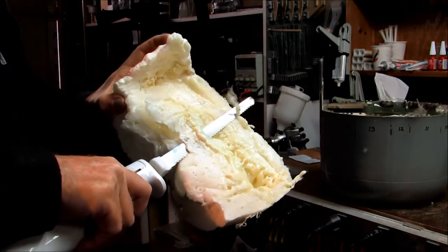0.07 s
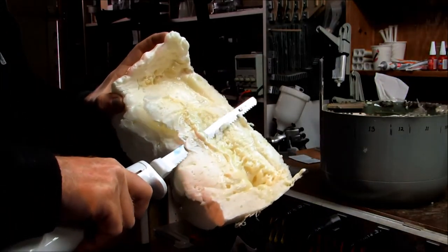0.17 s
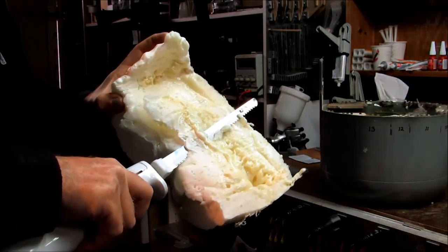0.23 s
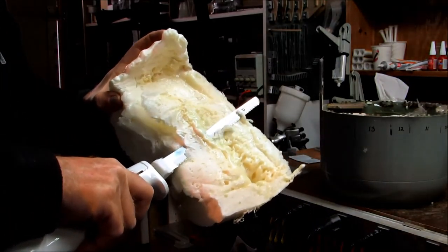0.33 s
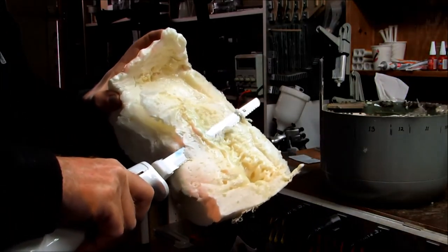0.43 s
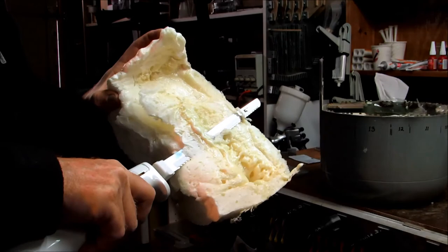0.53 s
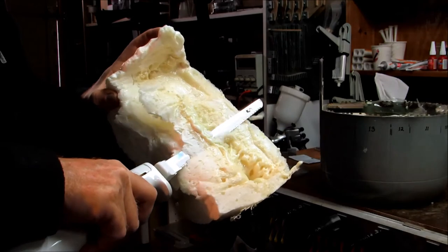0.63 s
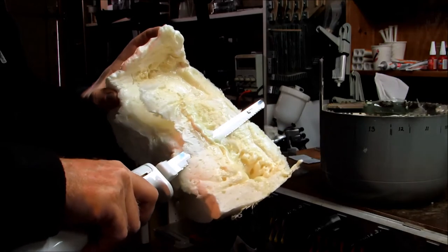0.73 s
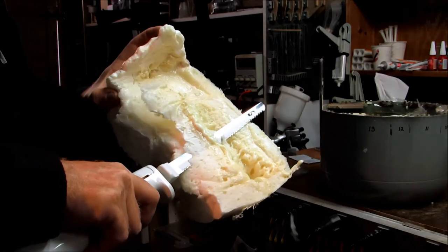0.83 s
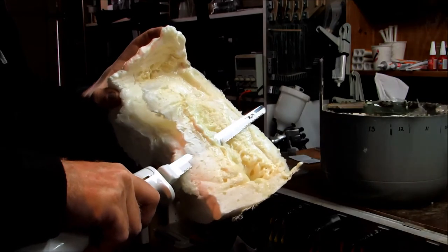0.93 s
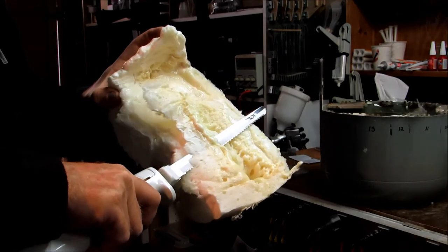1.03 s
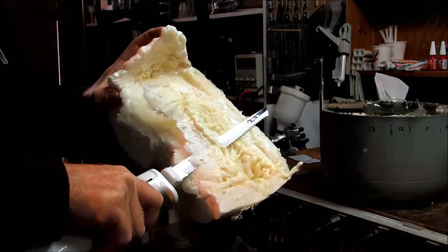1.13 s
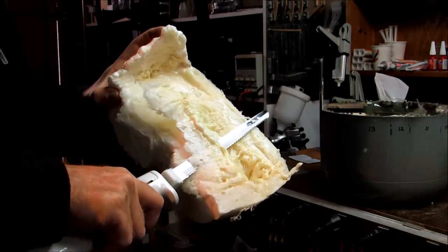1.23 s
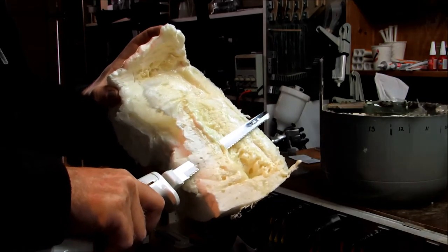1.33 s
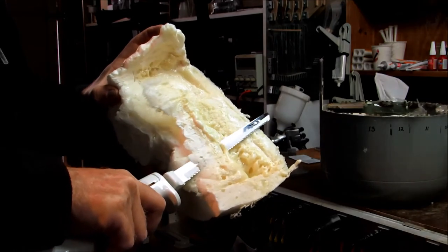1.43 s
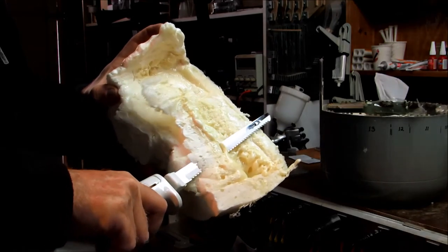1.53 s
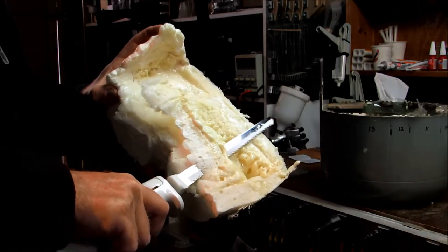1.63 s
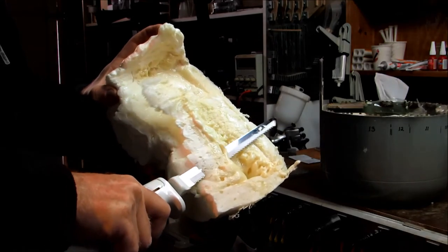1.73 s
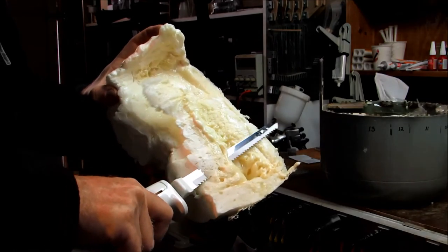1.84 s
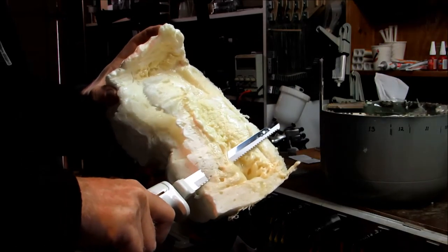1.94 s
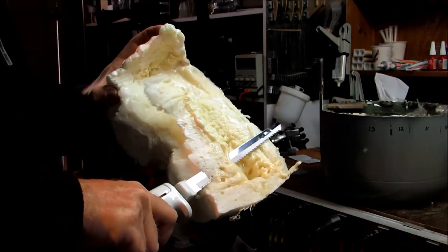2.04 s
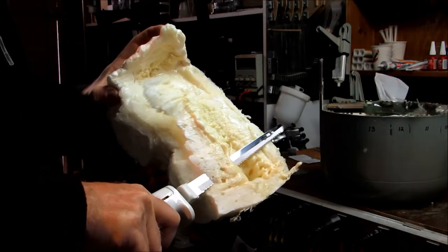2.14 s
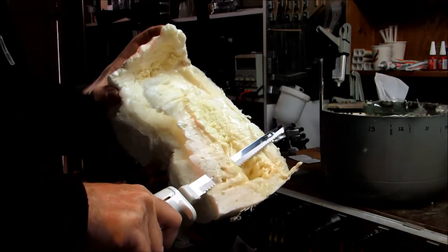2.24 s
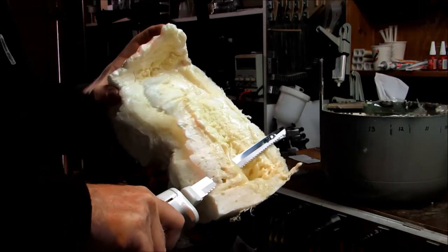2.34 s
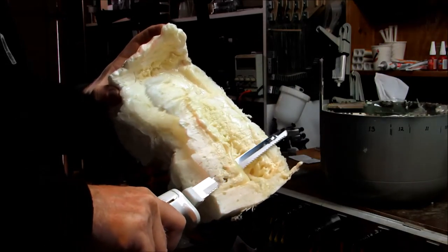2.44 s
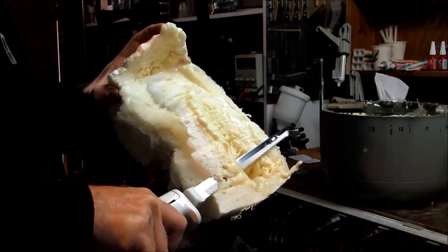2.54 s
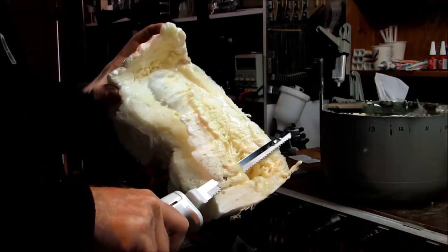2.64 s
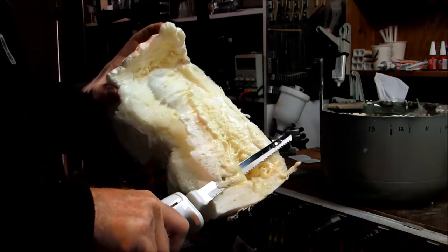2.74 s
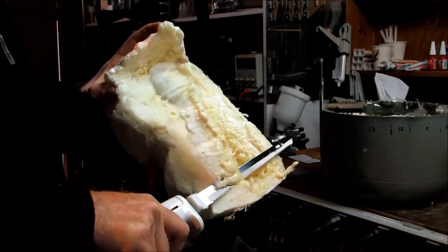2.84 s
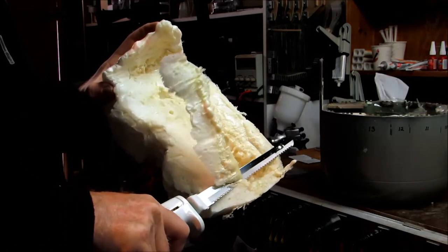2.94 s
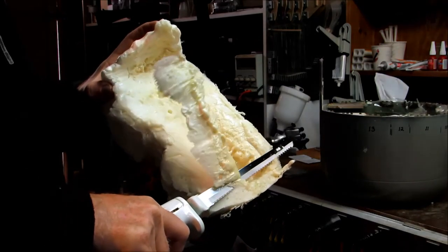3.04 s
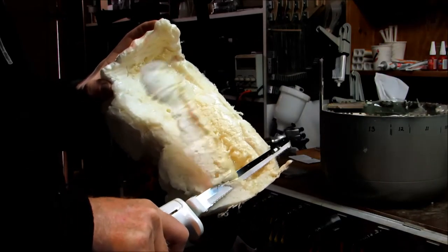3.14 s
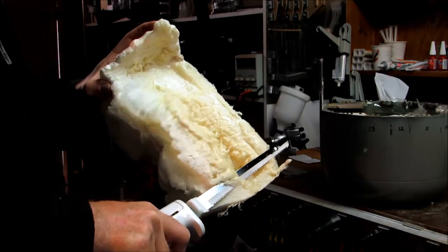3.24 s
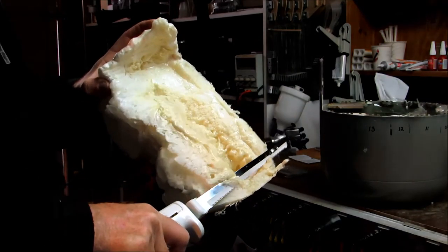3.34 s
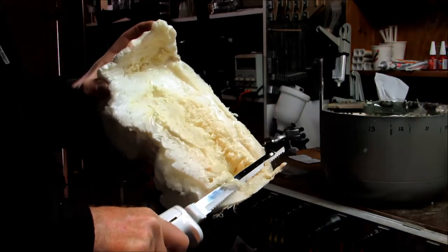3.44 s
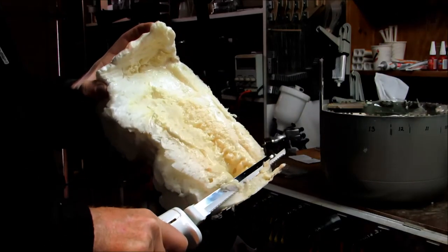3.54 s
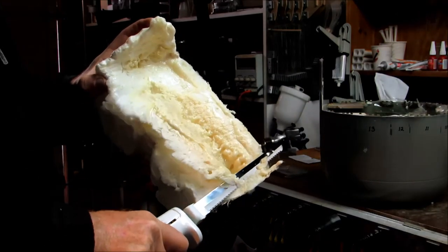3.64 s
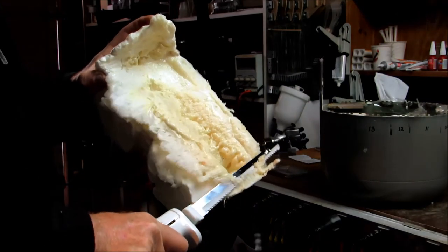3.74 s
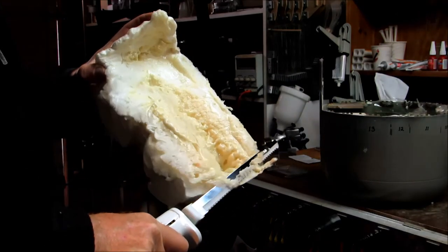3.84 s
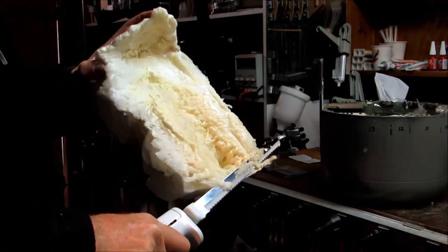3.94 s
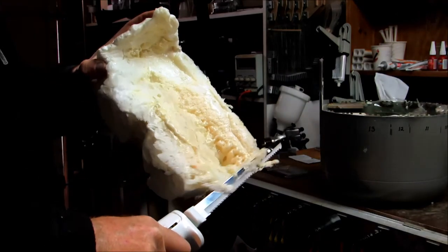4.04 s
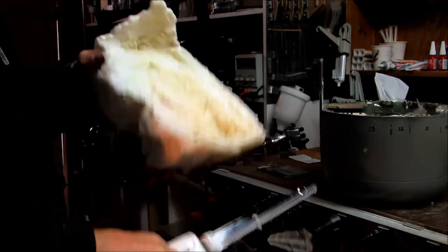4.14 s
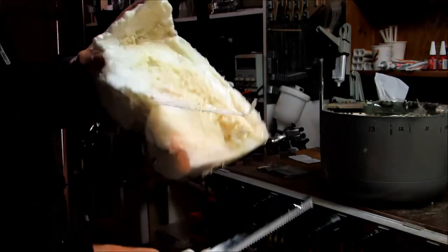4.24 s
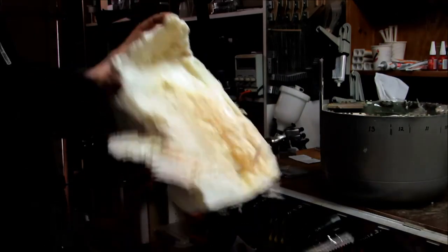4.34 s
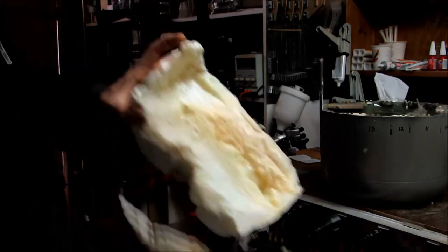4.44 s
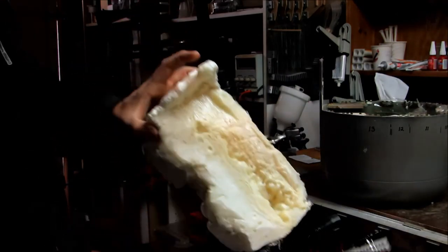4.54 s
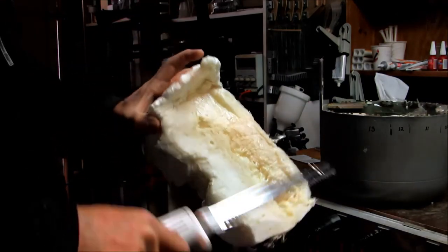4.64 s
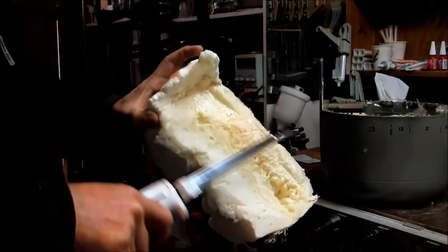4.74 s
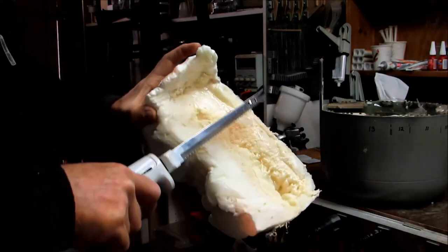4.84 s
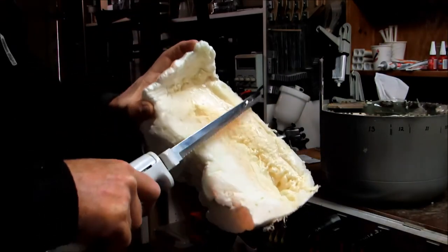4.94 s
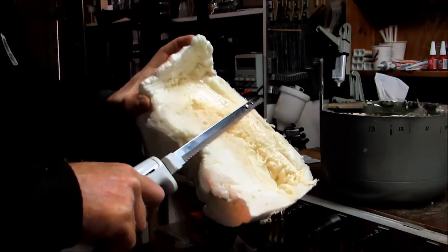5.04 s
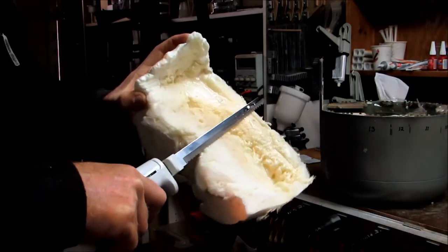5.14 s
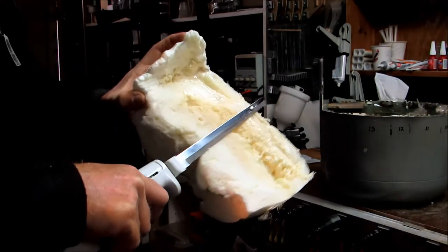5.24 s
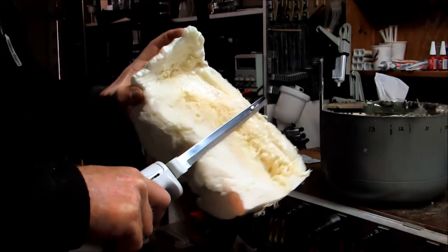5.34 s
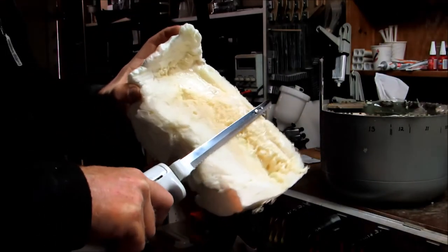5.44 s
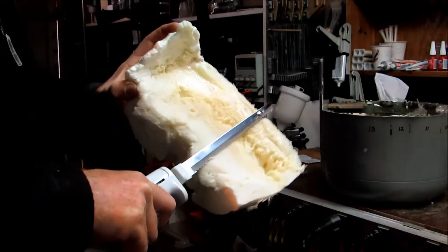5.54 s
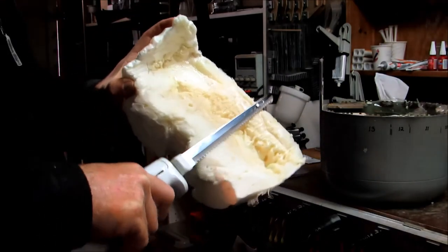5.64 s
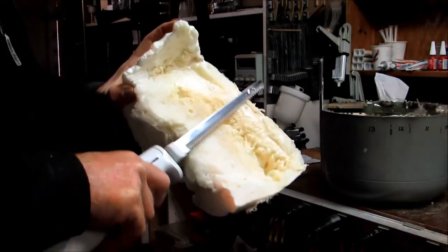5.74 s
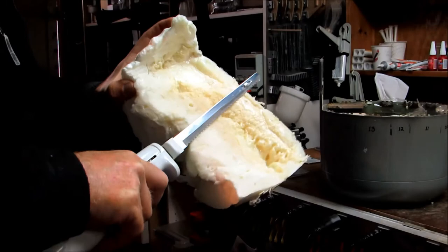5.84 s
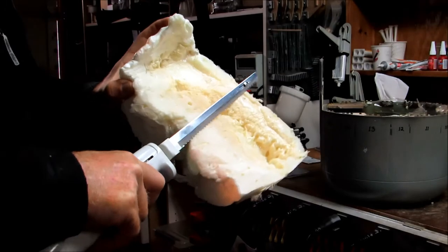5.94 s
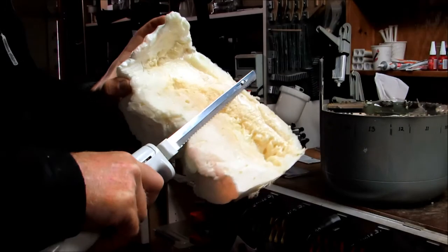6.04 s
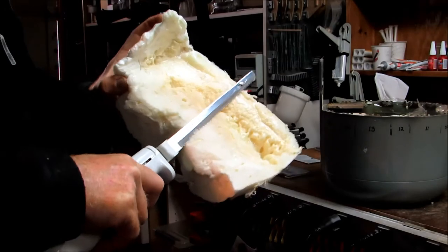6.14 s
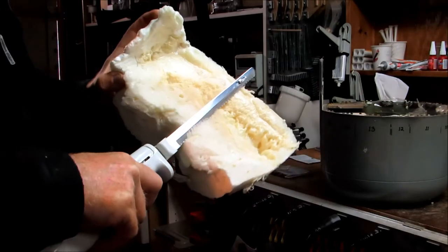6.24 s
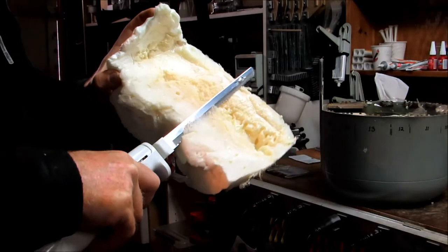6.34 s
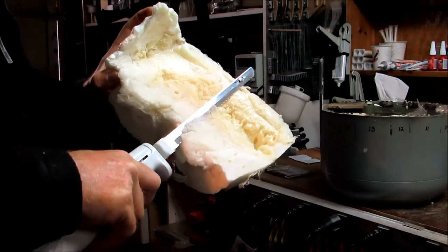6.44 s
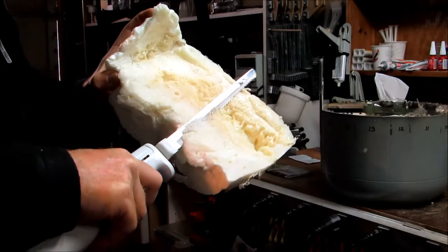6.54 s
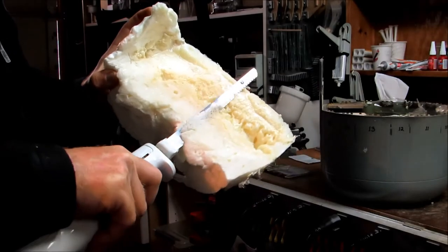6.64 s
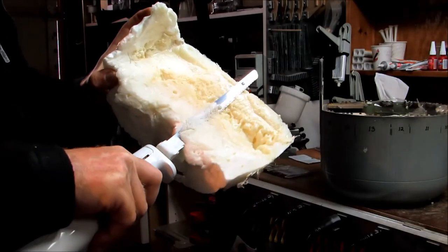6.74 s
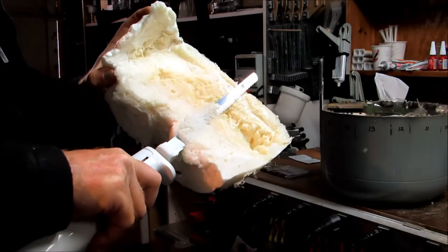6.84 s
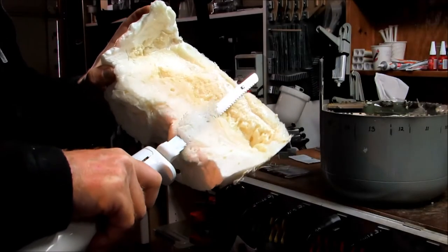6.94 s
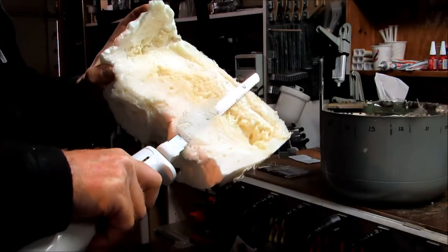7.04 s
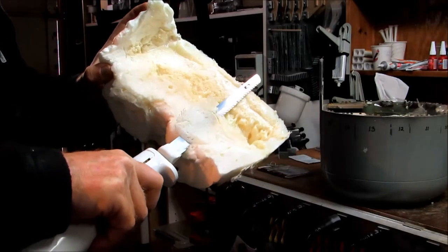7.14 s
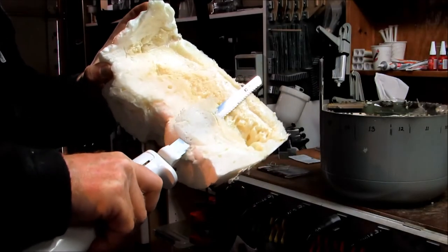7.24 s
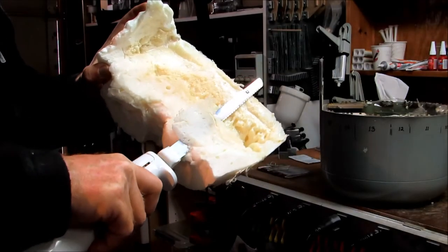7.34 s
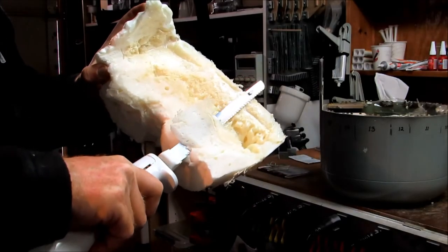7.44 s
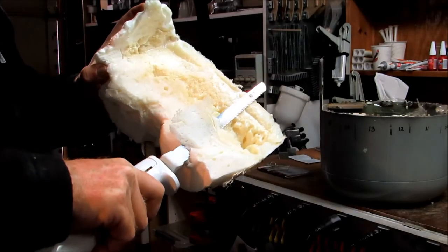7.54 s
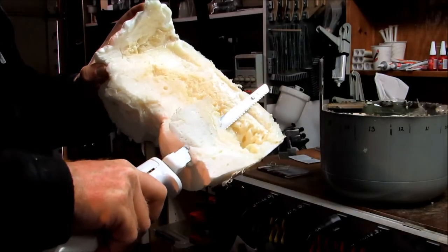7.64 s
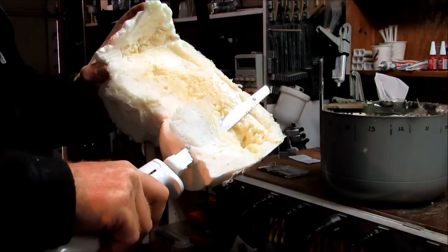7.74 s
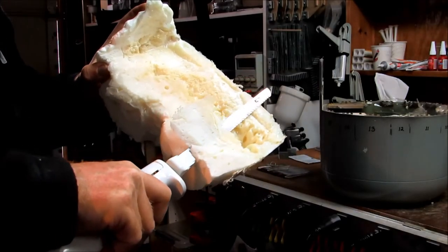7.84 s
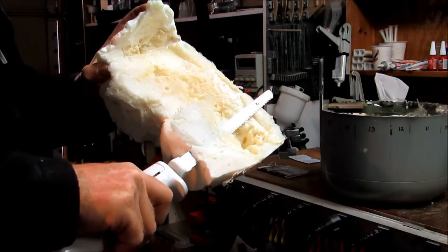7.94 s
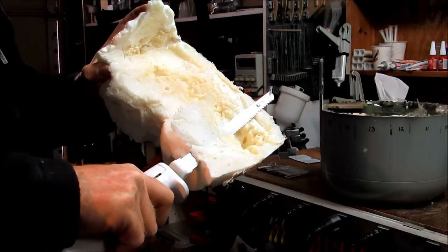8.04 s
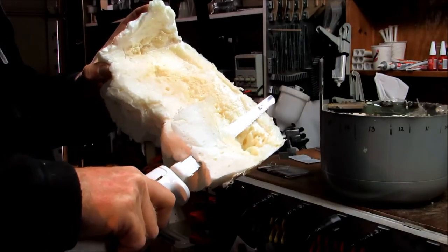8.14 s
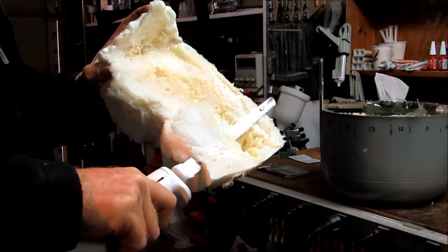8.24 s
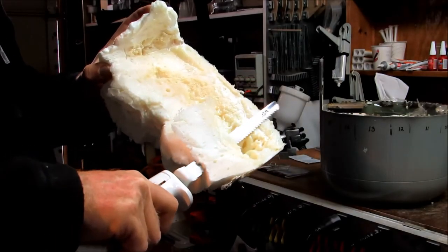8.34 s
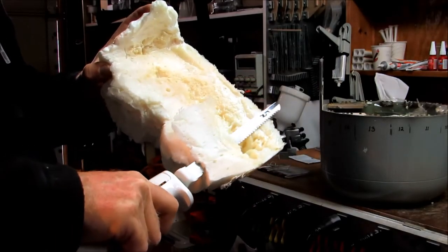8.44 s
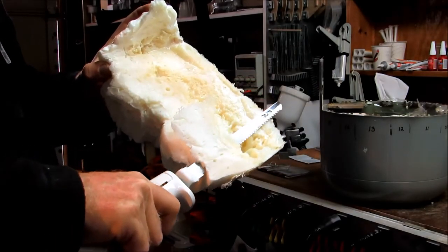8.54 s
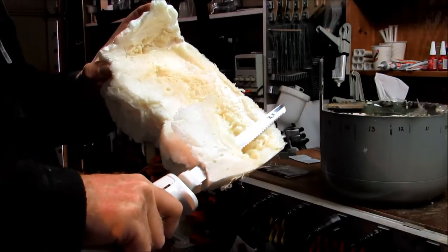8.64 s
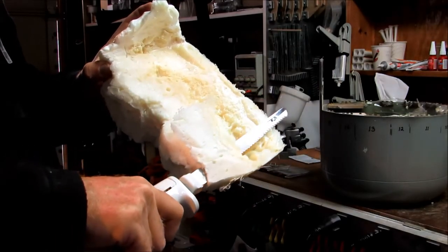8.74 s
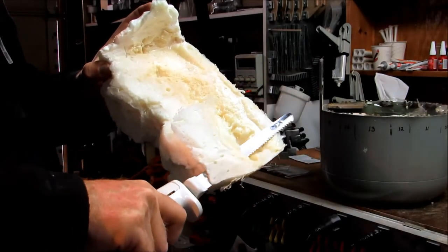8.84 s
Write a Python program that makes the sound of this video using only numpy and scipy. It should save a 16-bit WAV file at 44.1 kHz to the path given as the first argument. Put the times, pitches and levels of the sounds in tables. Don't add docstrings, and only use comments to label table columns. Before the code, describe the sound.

A small mains motor buzzes steadily, its gears chattering in a plastic housing while shuttling blades tear dry foam and make the block throb softly. Two short releases sag the pitch quickly; between them comes a longer falling wind-down with light knocks and a clattery restart. Heard close, with slight dull room echo and faint air noise, still cutting at the end.

```python
import sys
import numpy as np
from scipy import signal
from scipy.fft import rfft, irfft, next_fast_len
from scipy.io import wavfile

SR = 44100
rng = np.random.default_rng(int(sys.argv[2]) if len(sys.argv) > 2 else 0)


def boost_factor(decibels):
    exponent = np.asarray(decibels, float) / 20
    return 10 ** exponent


def transcribe(u):
    v = np.clip(np.atleast_2d(u).T, -1, 1)
    q = np.round(v * 32767).astype(np.int16)
    wavfile.write(sys.argv[1], SR, q)


N = 392490

CRANK_RATIO = 11
START_TURNS, FULL_TURNS = 273, 290

# (time [s], rotor speed [turns per s])
LOAD_SPEED = [(0, 278.3), (0.25, 274.7), (0.5, 284.0), (1.3, 279.9), (1.6, 278.6), (2.55, 274.9),
              (3.05, 310.6), (3.55, 298.8), (3.8, 299.8), (4.15, 325.0), (5.6, 322.1), (6.05, 317.0),
              (6.3, 294.8), (6.6, 291.8), (7.1, 298.6), (7.6, 294.5), (8.3, 283.8), (8.9, 290.6)]
# (let go [s], pulled again [s], braking [turns per s per s])
TRIGGER = [
    (.68, .903, 650),
    (4.162, 5.056, 400),
    (5.687, 5.912, 490),
]
# (time [s], bite of the teeth [dB], depth in the block [dB],
# ring of the housing in the grip [dB], play in the gears [dB])
CUT = [(0, 0, -2.5, 1.5, 0.5), (1.25, 3, 2, 1, 1.5), (2.0, 0.5, -1, 1.5, 0), (2.7, -1.5, 0.5, 2.5, -7),
       (2.9, -5, -1.5, 1, -3), (3.3, -7, -8.5, -0.5, 5.5), (3.47, -2.5, -5.5, 1.5, -5.5),
       (3.9, -1, -7, 1.5, -5), (4.04, -4.5, -8.5, -1.5, 2.5), (4.4, -19.5, -5, 4.5, 5),
       (5.3, -5.5, -2, 0.5, 2.5), (5.66, -4, -9.5, 0.5, 2.5), (6.1, -6, -1.5, 2, 2),
       (6.24, 1.5, -3, 1.5, 3.5), (6.65, -0.5, -3.5, -0.5, 0.5), (7.9, 0, -3.5, 0, 1.5),
       (8.1, -0.5, -1.5, 1, -6), (8.9, 1, -3.5, 0, -5)]

# (level at full speed [dB], power of the speed [1],
# change while coasting [dB], gain per share of pull-away surge [dB])
SLOT_LAW = (-32.5, 3, -7.5, 14.5)
UNBALANCE_LAW = (-33, 5, -8, -25)
WORM_LAW = (-38, 4, 1.8, 10)
REVERSAL_LAW = (-35.5, 5, -1.8, 8)
SPARK_LAW = (-33.5, 0, -12, 26.5)
RATTLE_LAW = (-20, 2.25, -0.3, 6.5)
RASP_LAW = (-23, 1.5, -2.5, -0.5)
THUD_LAW = (-33, 3, -5.5, -9)
BENCH_LAW = (-53.5, 1.5, -25, -24)

SLOT_ORDERS = [88, 86, 80, 76, 100]
COMMUTATOR_ORDERS = [176, 264]
WORM_ORDERS = [44, 41, 46]
REVERSAL_ORDERS = [32, 33, 34, 35, 38]
BLOCK_ORDERS = [3, 6, 7, 8, 9, 10, 11, 13, 15, 21]
GEAR_ORDERS = [53, 54, 55, 66, 77]
SLOT_DB = [-0.5, -14.5, -9, -17, -15]
COMMUTATOR_DB = [5, 4]
WORM_DB = [0.5, -12, -16]
REVERSAL_DB = [-12.5, -16.5, -13.5, -13, -17.5]
BLOCK_DB = [-25.5, -19.5, -23, -23, -9.5, -10, -29, -8.5, -11.5, -10.5]
GEAR_DB = [-24.5, -85, -18.5, -31.5, -34]

# (centre [Hz], width [Hz], lift [dB])
HOUSING_PEAKS = [(860, 60, 9), (1000, 300, 8), (3500, 400, 9), (4750, 150, 5), (5350, 500, 9)]
SLOT_PEAKS = [(1010, 320, 16), (1420, 170, 12), (2124, 190, 4), (2333, 123, 3.5)]
UNBALANCE_PEAKS = [(553, 25, 1.5), (592, 15, 1.5)]
WORM_PEAKS = [(1037, 96, 9.5), (1203, 74, 0.5)]

# (frequency [Hz], level [dB per Hz])
RATTLE_COLOUR = [(240, -52), (400, -19), (588, -8), (798, -6.5), (925, -4.5), (1100, -7.5), (1200, -6),
                 (1730, -6), (2420, -4), (2840, -10.5), (3950, -14.5), (4840, -16), (6000, -17),
                 (7800, -17), (13200, -120)]
COAST_COLOUR = [(180, -71), (300, -46), (678, -47), (721, -0.5), (871, -3), (1080, 5.5), (1300, -39),
                (2070, -30), (3630, -14.5), (3970, -36), (6000, -45), (7800, -75), (13200, -120)]
RASP_COLOUR = [(1760, -48), (3000, -2), (3500, 5.5), (3980, -14), (4610, -1.5), (8090, 1), (12400, 3.5),
               (13700, 0.5), (14900, -13.5)]
THUD_COLOUR = [(18, -65), (30, -38), (75, -11), (123, -25.5), (247, 0), (353, -0.5), (447, 1), (574, -6),
               (700, 0), (910, -38), (1540, -120)]
SHOP_COLOUR = [(20, -26), (40, -4), (230, -17), (541, -9), (949, -20), (3910, -24), (12000, -30),
               (14900, -38)]

# (time [s], thud [dB], rattle [dB], rasp [dB], time to fall 60
# dB [s])
BUMPS = [
    (.89, -37, -24, -34, 0.15),
    (.93, -35, -33, -31, 0.28),
    (3.19, -26, -24, -50, 0.36),
    (4.99, -34, -30, -23, 0.19),
    (5.02, -56, -23.5, -34, 0.17),
    (5.065, -41, -42, -30, 0.28),
    (5.13, -37, -26, -51, 0.26),
]
# (time [s], peak [dB], ring [Hz], crack above 4 kHz [dB], time to fall 60 dB [s])
KNOCKS = [(0.91, -12, 2550, -35, 0.051), (0.922, -10.5, 1010, -39, 0.063), (0.941, -14, 3520, -24, 0.06),
          (4.665, -13.5, 1640, -51, 0.082), (4.755, -20, 1420, -29.5, 0.16), (4.968, -33, 1910, -50, 0.078),
          (4.988, -21, 2590, -22.5, 0.09), (5.008, -14, 1140, -22, 0.071), (5.021, -16, 2290, -32, 0.038),
          (5.032, -10, 3380, -27, 0.04), (5.06, -16.5, 3160, -29, 0.17)]

# (frequency [Hz], likeness [0 to 1])
LIKENESS = [(60, 0.99), (150, 0.95), (370, 0.79), (930, 0.83), (2320, 0.93), (5790, 0.63), (14400, 0.29)]
# (frequency [Hz], left minus right [dB])
LEAN = [(60, 2.5), (150, -4), (370, -1.5), (930, 0), (2320, -0.5), (5790, 0.0), (14400, -1)]
# (centre [Hz], width [Hz])
DIPS = [(3900, 160), (7800, 120)]


def rotor():
    step, spin_up_s = 88, .148
    t = np.arange(N // step + 2) * step / SR
    goal = np.interp(t, *np.transpose(LOAD_SPEED))
    turns = np.full(len(t), float(START_TURNS))
    braking = sum(brake * (t >= off) * (t < on) for off, on, brake in TRIGGER)
    for i in range(len(t) - 1):
        push = -braking[i] if braking[i] else (goal[i] - turns[i]) / spin_up_s
        turns[i + 1] = max(turns[i] + push * step / SR, 0)
    current = 1. * (braking == 0)
    surge = current * np.clip(1 - turns / goal, 0, 1)
    return [np.interp(np.arange(N) / step, np.arange(len(t)), v) for v in (turns, current, surge)]


def whine(crank, crank_hz, thud_db, rattle_db, ripple, motion):
    turns, current, _ = motion
    _, depth_db, grip_db, play_db = in_time(CUT)
    slot_db = level(SLOT_LAW, motion) + 1.55 * grip_db + peaks_db(SLOT_PEAKS, SLOT_ORDERS[0] * crank_hz)
    unbalance_db = 2.5 + level(UNBALANCE_LAW, motion) + 1.4 * depth_db + peaks_db(UNBALANCE_PEAKS, 2 * turns)
    worm_db = level(WORM_LAW, motion) + 1.2 * play_db + peaks_db(WORM_PEAKS, WORM_ORDERS[0] * crank_hz)
    reversal_db = level(REVERSAL_LAW, motion) + 0.66 * play_db
    drive = boost_factor(rattle_db)

    magnetism = np.sqrt(lag(current, .06)) * ripple
    once_a_turn = 1 + .9 * current * np.cos(2 * np.pi * crank)
    out = magnetism * boost_factor(slot_db) * lines(SLOT_ORDERS, SLOT_DB, crank, 2.4, 14.0)
    out += boost_factor(unbalance_db) * lines([2 * CRANK_RATIO], [0], crank, 2.0, 5)
    out += once_a_turn * boost_factor(worm_db) * lines(WORM_ORDERS, WORM_DB, crank, 1.0)
    out += boost_factor(reversal_db) * lifted(REVERSAL_ORDERS, REVERSAL_DB, crank, crank_hz, 1.5, 4)
    out += boost_factor(thud_db) * lines(BLOCK_ORDERS, BLOCK_DB, crank, 1.5)
    out += current * drive * lifted(GEAR_ORDERS, GEAR_DB, crank, crank_hz, 3.4, 25.0)
    out *= np.clip(crank_hz / 4 - 1, 0, 1)
    sparking = drive * boost_factor(level(SPARK_LAW, motion))
    return out + sparking * lifted(COMMUTATOR_ORDERS, COMMUTATOR_DB, crank, crank_hz, 5, 60)


def slack_share(bite_db, current, surge):
    coasting = (0.17 - 0.033 * bite_db) * (1 - current)
    return np.clip(lag(coasting + surge, 0.027), 0, .95)


def gear_rattle(crank, rattle_db, slack, ripple, bump):
    driven_gate = ripple * strokes(crank, 0.021, 1.0) * boost_factor(0.65 * drift(15))
    driven = coloured(RATTLE_COLOUR, 0.45, driven_gate)
    loose = boost_factor(-1.0) * coloured(COAST_COLOUR, 1.1, strokes(1.2 * crank, 0.11, 1.5))
    steady = np.sqrt(1 - slack) * driven + np.sqrt(slack) * loose
    return boost_factor(rattle_db - 2.5) * steady + bump * (1.2 * driven + 0.29 * loose)


def tooth_rasp(crank, bite_db, motion, bump):
    lurch_db = 2.5 * (1 - motion[1]) * np.cos(2 * np.pi * (crank + 0.32))
    rasp_db = level(RASP_LAW, motion) + bite_db + lurch_db
    gate = strokes(crank, 0.54, 1.0) * boost_factor(0.75 * drift(22.0))
    return (boost_factor(rasp_db) + bump) * coloured(RASP_COLOUR, 4.1, gate)


def foam_thud(thud_db, bump):
    return (boost_factor(thud_db) + bump) * coloured(THUD_COLOUR, 0.89)


def bench_shake(depth_db, motion, bump):
    shake = boost_factor(level(BENCH_LAW, motion) - 0.95 * depth_db) + boost_factor(-9) * bump
    colour = [(70, -29), (110, -13.5), (150, -6.5), (200, -2.0), (280, -22), (900, -90)]   # (Hz, dB per Hz)
    return shake * coloured(colour, .3)


def bumps():
    out, t, rise_s = 0, np.arange(N) / SR, 0.019
    for s, *tops_db, t60 in BUMPS:
        since = np.maximum(t - s, 0)
        fading = boost_factor(np.array(tops_db)[:, None] - 60 * since / t60)
        out = out + fading * np.minimum(since / rise_s, 1)
    return out


def knocks():
    out, t = np.zeros(N + 9000), np.arange(9000) / SR
    bright = signal.butter(1, [3000, 9000], "band", fs=SR, output="sos")
    r = np.exp(-np.pi * 150 / SR)
    for s, peak_db, ring_hz, crack_db, t60 in KNOCKS:
        chatter, hiss = rng.standard_normal((2, len(t))) * boost_factor(-60 * t / t60)
        strike = (t == 0) + 0.074 * chatter
        resonance = [1, -2 * r * np.cos(2 * np.pi * ring_hz / SR), r * r]
        ring = signal.lfilter([.5, 0, -.5], resonance, strike)
        ring = signal.lfilter([.4], [1, -.6], ring)
        crack = signal.sosfilt(bright, hiss)
        i = round(s * SR)
        out[i:i + len(t)] += boost_factor(peak_db - 0.5) * ring + boost_factor(crack_db + 3.5) * crack
    return out[:N]


def shop_echo(x):
    t = np.arange(int(.4 * SR)) / SR
    tail = rng.standard_normal((2, len(t))) * boost_factor(-60 * t / 0.18) * (t > .006)
    tail = signal.lfilter([1], [1, -.5], tail)
    tail = tail / np.sqrt(np.sum(tail ** 2, axis=1, keepdims=True))
    return signal.fftconvolve(x[None], tail, axes=1)[:, :N]


def quiet_shop():
    t = np.arange(N) / SR
    hum = boost_factor(-58 + 2.5 * drift(15)) * np.sin(2 * np.pi * 545 * t)
    return boost_factor(-53.5) * coloured(SHOP_COLOUR, .3) + hum


def strokes(crank, depth, sharp):
    return 1 - depth + depth * np.abs(np.sin(2 * np.pi * (crank + 0.056))) ** sharp


def lines(orders, levels_db, crank, wobble_db, rate=1.17):
    out = np.zeros(N)
    for k, level_db in zip(orders, levels_db):
        gain = np.sqrt(2) * boost_factor(level_db + wobble_db * drift(rate))
        out += gain * np.cos(2 * np.pi * (k * crank + .2 * rng.random()))
    return out


def lifted(orders, levels_db, crank, crank_hz, wobble_db, rate):
    lift_db = [peaks_db(HOUSING_PEAKS, k * crank_hz) for k in orders]
    return lines(orders, np.array(levels_db)[:, None] + lift_db, crank, wobble_db, rate)


def peaks_db(peaks, hz):
    return sum(db / (1 + (2 * (hz - centre) / width) ** 2) for centre, width, db in peaks)


def level(law, motion):
    full_db, power, coast_db, surge_db = law
    turns, current, surge = motion
    speed_db = 20 * power * np.log10(turns / FULL_TURNS + 0.04)
    return full_db + speed_db + coast_db * (1 - current) + surge_db * surge


def coloured(spectrum, grain_db, gate=1):
    size = next_fast_len(N)
    hz = np.arange(size // 2 + 1) * SR / size
    sizes = np.minimum(rng.exponential(1, N), 3)
    grains = rng.standard_normal((2, N)) * boost_factor(grain_db * sizes) * gate
    mid, side = rfft(grains, size) * boost_factor(at_hz(spectrum, hz))
    alike = np.clip(at_hz(LIKENESS, hz), 0, 1)
    pair = np.sqrt(1 + alike) * mid + np.sqrt(1 - alike) * side * np.array([[1], [-1]])
    return rms_one(irfft(pair, size)[:, :N])


def drift(rate):
    r = np.exp(-80 * np.pi * rate / SR)
    slow = signal.lfilter([1], [1, -2 * r, r * r], rng.standard_normal(N // 40 + 2002))[2000:]
    return np.interp(np.arange(N) / 40, np.arange(len(slow)), rms_one(slow))


def lag(x, seconds):
    r = np.exp(-1 / (seconds * SR))
    return signal.lfilter([1 - r], [1, -r], x - x[0]) + x[0]


def rms_one(x):
    return x / np.sqrt(np.mean(x ** 2) + 1e-20)


def in_time(rows):
    s, *columns = np.transpose(rows)
    return [np.interp(np.arange(N) / SR, s, c) for c in columns]


def at_hz(points, hz):
    p = np.array(points, float)
    return np.interp(np.log(hz + 1), np.log(p[:, 0] + 1), p[:, 1])


def scene():
    t = np.arange(N) / SR
    turns, current, surge = rotor()
    motion = turns, np.clip(lag(current, 0.019), 0, 1), lag(surge, .01)
    crank_hz = turns / CRANK_RATIO
    shudder = 0.0049 * motion[2] * drift(30)
    crank = np.cumsum(crank_hz) / SR + shudder
    ripple = 1 + .17 * np.sin(2 * np.pi * 120 * t)

    bite_db, depth_db, grip_db, _ = in_time(CUT)
    thud_db = level(THUD_LAW, motion) + depth_db + 0.7 * drift(6.7)
    rattle_db = level(RATTLE_LAW, motion) + grip_db
    slack = slack_share(bite_db, current, surge)
    bump_thud, bump_rattle, bump_rasp = bumps()

    near = whine(crank, crank_hz, thud_db, rattle_db, ripple, motion) + knocks()
    out = near + boost_factor(-15.5) * shop_echo(near)
    out += gear_rattle(crank, rattle_db, slack, ripple, bump_rattle)
    out += tooth_rasp(crank, bite_db, motion, bump_rasp)
    out += foam_thud(thud_db, bump_thud)
    out += bench_shake(depth_db, motion, bump_thud)
    return out + quiet_shop()


def top_cut(x):
    return signal.sosfilt(signal.butter(12, 15050, fs=SR, output="sos"), x)


def record(dry):
    size = next_fast_len(N)
    hz = np.arange(size // 2 + 1) * SR / size
    lean = boost_factor(at_hz(LEAN, hz) / 2 * np.array([[1], [-1]]))
    x = irfft(rfft(dry, size) * lean, size)[:, :N]
    for dip_hz, width_hz in DIPS:
        x = signal.lfilter(*signal.iirnotch(dip_hz, dip_hz / width_hz, SR), x)
    x = .8 * np.tanh(x / .8)
    x = signal.sosfilt(signal.butter(8, 14300, fs=SR, output="sos"), x)
    return top_cut(x)


dry = scene()
out = record(dry)
transcribe(out)
```